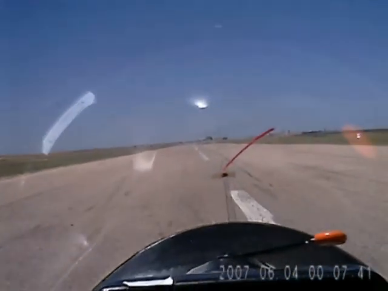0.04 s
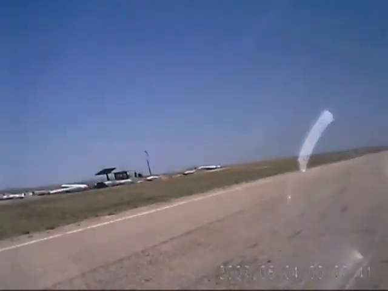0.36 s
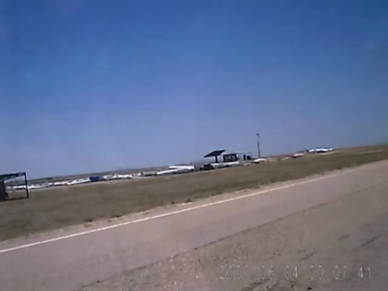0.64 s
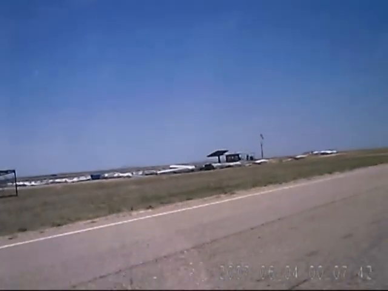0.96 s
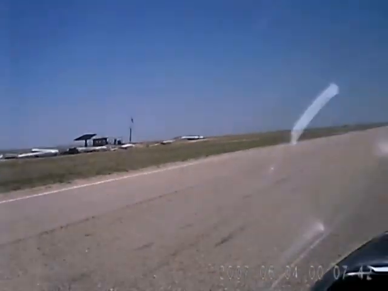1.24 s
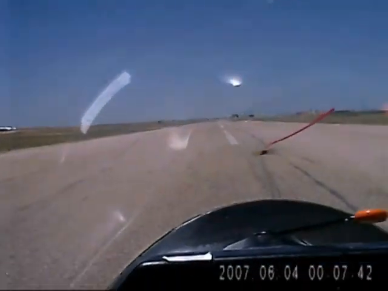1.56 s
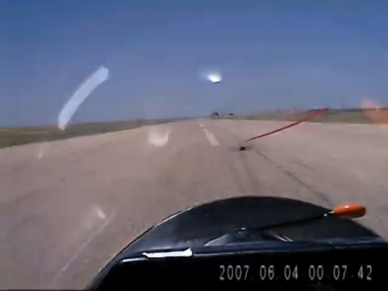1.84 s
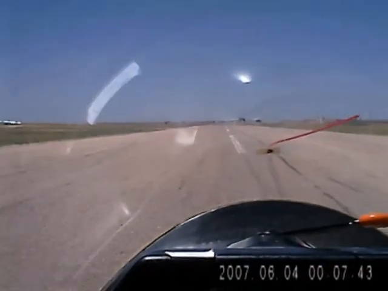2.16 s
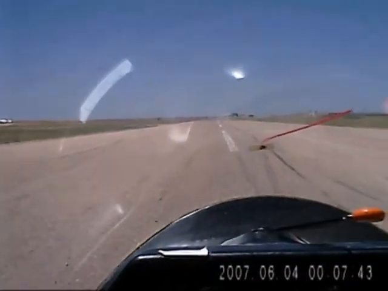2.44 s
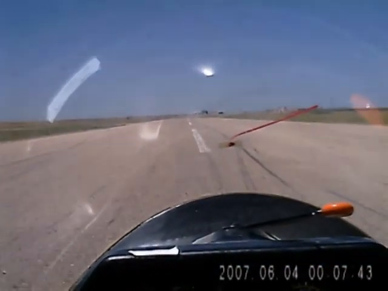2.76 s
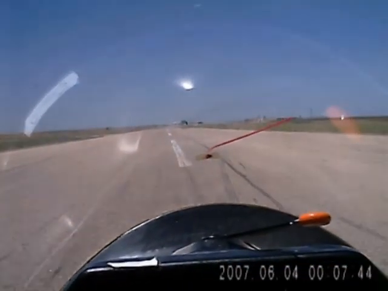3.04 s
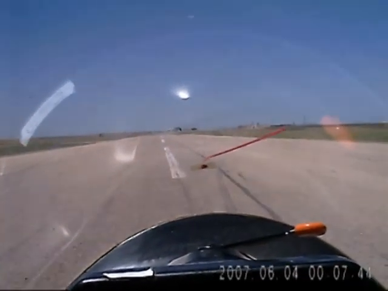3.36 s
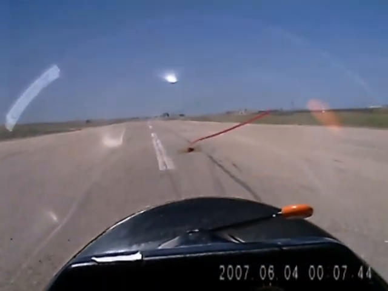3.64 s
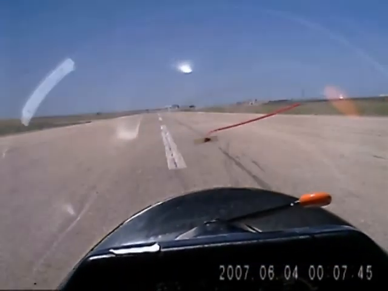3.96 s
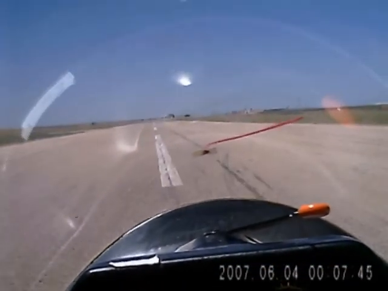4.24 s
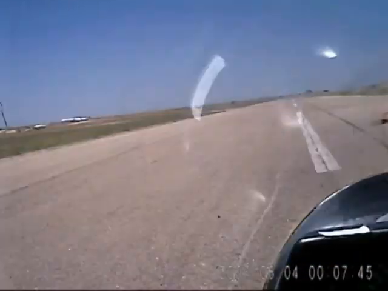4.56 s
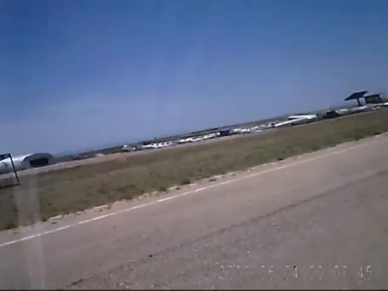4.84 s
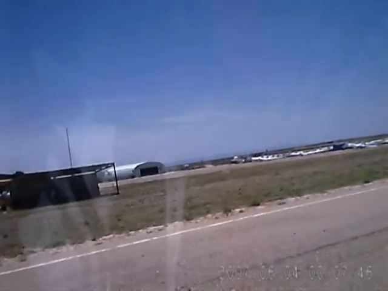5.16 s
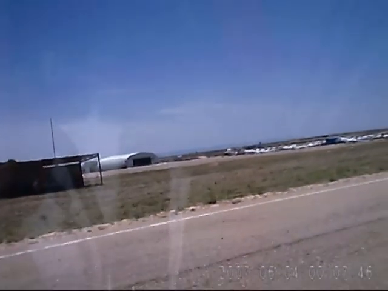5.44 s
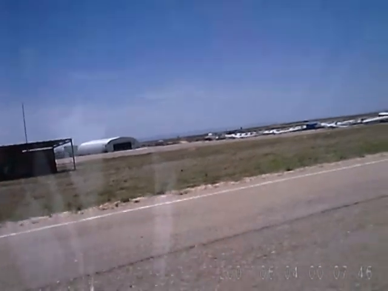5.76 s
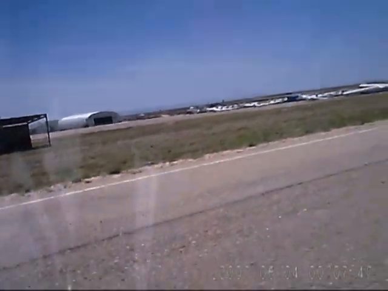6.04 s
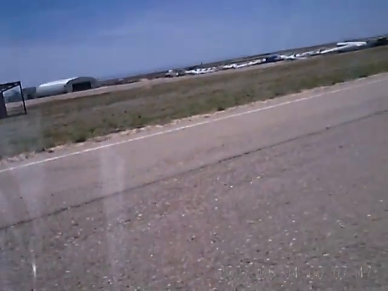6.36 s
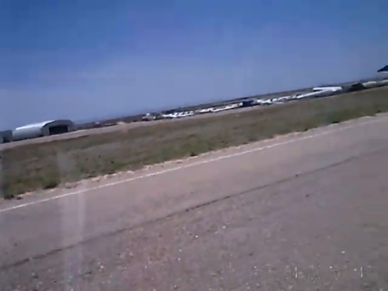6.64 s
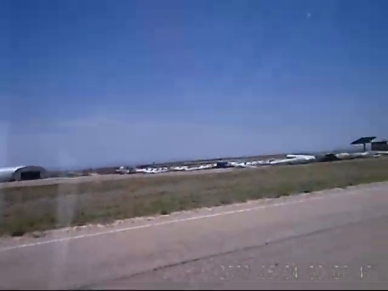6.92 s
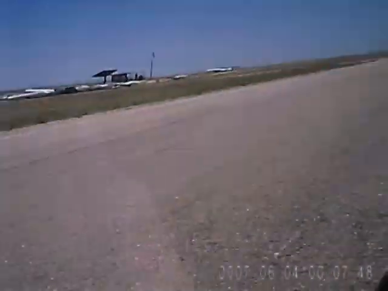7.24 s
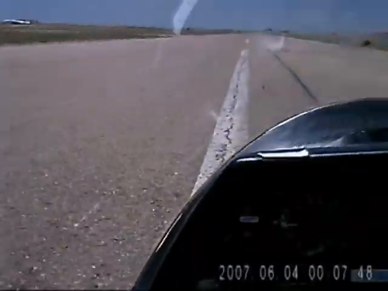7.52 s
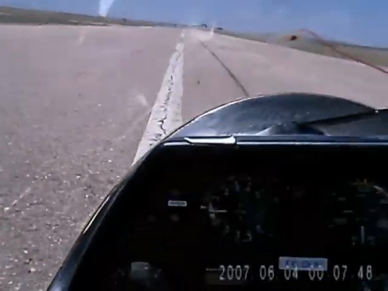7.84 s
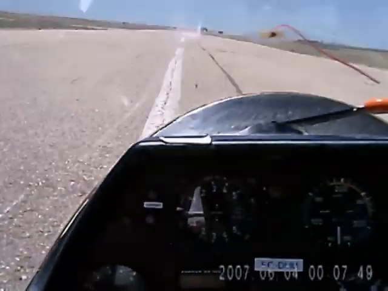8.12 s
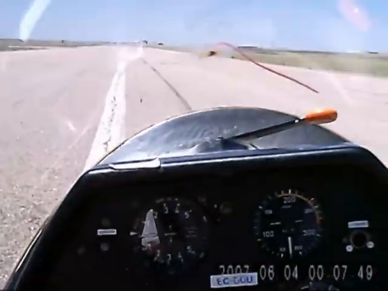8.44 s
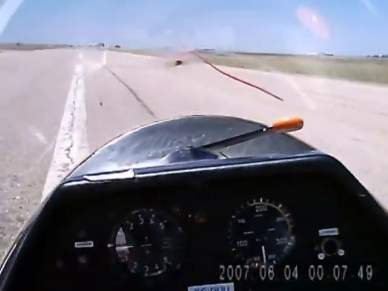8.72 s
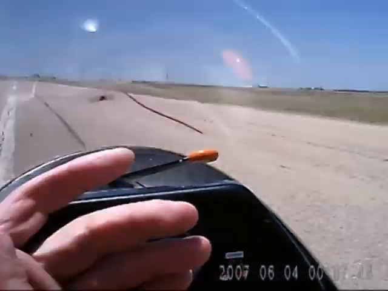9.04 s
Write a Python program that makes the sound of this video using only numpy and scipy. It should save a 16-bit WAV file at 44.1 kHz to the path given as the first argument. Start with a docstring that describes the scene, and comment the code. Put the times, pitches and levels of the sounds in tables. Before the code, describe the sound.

From inside a slowing glider, a hollow wheel rumble fades into four thuds, knocking fittings and a soft brake groan.

```python
"""Glider rolling out, from the cockpit

A small camera's microphone rides inside the cockpit as the glider slows on an asphalt runway.
The wheel rumbles through the hollow fuselage and four heavy bumps make the shell boom. Close by, air
leaks past the canopy, fittings knock, a control rod slides and the wheel brake groans and squeaks.
The camera overloads on one side of the wave and adds its own hiss and a thin whine."""
import sys
import numpy as np
from scipy import signal
from scipy.fft import rfft, irfft, next_fast_len
from scipy.io import wavfile

SR = 44100
rng = np.random.default_rng(int(sys.argv[2]) if len(sys.argv) > 2 else 0)


def master_out(mix):
    """Clip the mix to full scale and print it as 16-bit PCM to the path in sys.argv[1]."""
    frames = np.transpose(np.atleast_2d(mix))
    ceiling = np.clip(frames, -1, 1)
    pcm = np.round(ceiling * 32767).astype(np.int16)
    wavfile.write(sys.argv[1], SR, pcm)


N = 409688
SIZE = next_fast_len(N, True)
TIME, HZ = np.arange(N) / SR, np.fft.rfftfreq(SIZE, 1 / SR)

# hiss of the microphone's preamplifier: (frequency [Hz], density [dB])
PREAMP_SPECTRUM = [(20, 13), (70, 14.5), (400, 2.5), (3000, -2.5), (6000, -1.5), (11500, -3.5)]
# air leaking past the canopy seal: (time [s], level [dB]) and (frequency [Hz], density [dB])
AIR_LEVEL = [(0, -50), (3.5, -48), (5.6, -43), (8.1, -46.5), (9.29, -44.5)]
AIR_SPECTRUM = [(300, 12.5), (900, 3), (1600, 0.5), (2100, -3.5), (2600, -5.5), (2950, -2), (3400, -4.5),
                (4000, -9.5), (4600, -9), (7000, -14)]
# strokes of a control rod in its guide: (time of the top [s], level [dB], rise [s], t60 [s])
ROD_STROKES = [(6.69, -36, 0.087, .25), (6.85, -48, 0.2, 1.6), (8.8, -56, 0.27, 4)]
# resonances of the rod and of the wheel brake: (frequency [Hz], width [Hz], level [dB])
ROD_MODES = [(1070, 45, -3), (1270, 45, -1), (1424, 73, -1), (2035, 89, -5), (2130, 74, -6),
             (2630, 90, -16)]
BRAKE_MODES = [(427, 23, 2), (488, 28, -7), (579, 32, -3), (659.5, 26, -3), (768, 15, -5.5)]
# the brake bites gradually, then lets go: (time [s], rise [s], level [dB], t60 [s])
BRAKE_DRAGS = [(4.4, 1.85, -26, .9), (6.45, 0.33, -35, 1.9), (7.87, 0.17, -41.5, .4)]
# faint squeaks of the brake: (time [s], level [dB])
BRAKE_SQUEAKS = [(5.15, -56.5), (5.265, -51), (5.39, -57), (5.64, -58)]
# knocks of loose fittings: (time [s], level [dB], t60 [s]) and (frequency [Hz], density [dB])
FITTING_KNOCKS = [(5.861, -4, 0.38), (5.972, -13, .1), (6.089, -17.5, 0.21), (6.523, -27, 0.18),
                  (6.575, -27, 0.18), (6.646, -20, 0.15), (6.674, -14, 0.13), (6.788, -16.5, .1),
                  (6.962, -26, .25), (7.031, -23.5, 0.14), (7.441, -12, 0.15), (7.563, -23, 0.14),
                  (7.622, -22.5, 0.42), (7.78, -28, 0.15), (7.986, -36, 0.47), (8.857, -31.5, .1)]
KNOCK_SPECTRUM = [(60, 3.5), (150, -1), (300, 4.5), (550, 4), (850, -5), (1400, -12.5), (2100, -21),
                  (3000, -43), (8000, -44)]
# two faint clicks of microphone overload in the loud early rumble, then light rattles:
# (time [s], level [dB], t60 [s], brightness [dB/octave])
CLICKS_AND_RATTLES = [(.27, -33, .05, -1), (.35, -32, .05, -1), (3.226, -19, .1, -12),
                      (3.873, -29.5, .065, -7), (4.736, -31, .05, -7.5), (5.099, -34, .08, 0),
                      (5.302, -33, .07, -1), (5.4, -36, .06, -1), (5.787, -16, 0.022, -1),
                      (5.928, -20, 0.054, -3.5), (6.089, -22, 0.1, -10), (5.99, -30, 0.55, -10),
                      (6.21, -29, 0.21, -12.5), (6.431, -29, 0.061, -13.5), (7.345, -33, 0.089, 1.5),
                      (7.485, -31, .08, -7), (7.611, -29, 0.14, -10), (7.722, -34, .08, -10),
                      (8.739, -38.5, 0.065, 6)]
# colour of clicks, rattles and grit: (frequency [Hz], density [dB])
TICK_SPECTRUM = [(300, -14), (900, 4.5), (1600, 4), (2300, -5), (3200, -6), (4500, -14), (8000, -20.5),
                 (12000, -31)]
# resonances of the fuselage around the microphone: (frequency [Hz], width [Hz], lift [dB])
SHELL_MODES = [(125.6, 45, 6), (202, 14.4, 4.5), (221.3, 9.1, 3.5), (284.8, 27.3, 8.5), (369, 21, 8),
               (429.6, 28, 5), (467, 46, 3.5), (524.7, 18, 7), (604, 19, 4), (638, 25, 4.5), (698, 20.6, 8),
               (873, 18, 4), (1035, 14, 6.5), (1110, 27, 3.5), (1490, 160, 1.5)]
# rumble of the wheel, falling as the glider slows: (time [s], level [dB])
ROLL_LEVEL = [(0, -13.5), (1, -12.5), (3.5, -16), (5.7, -22), (6.27, -20), (6.42, -44), (6.7, -27.5),
              (7.2, -41), (8.2, -45), (8.8, -36.5), (9.05, -47)]
# thrum as the wheel takes the glider's weight: (time [s], level relative to the rolling [dB])
THRUM_LEVEL = [(0, -28), (2.3, -10.5), (4.3, -6), (5.5, -13), (6.2, -3.5), (6.8, -9), (8.6, -1.5)]
# force of the tyre on the asphalt: (frequency [Hz], density [dB])
TYRE_SPECTRUM = [(25, -25.5), (55, -9.5), (82, -23.5), (115, -7), (165, -4), (250, -1), (340, -6),
                 (480, -9), (720, -17), (950, -24.5), (1500, -33.5), (2300, -48), (4000, -58)]
# heavy bumps of the undercarriage:
# (time [s], judder [dB], rise [s], t60 [s], brightness [dB/octave], boom [dB], clank [dB])
HEAVY_BUMPS = [(5.750, -4.5, 0.022, 1.54, 1, -2.5, -18), (7.252, -4.5, 0.037, 0.58, 1, -12, -15),
               (8.275, -13, 0.038, 0.45, -1.5, -13.5, -25.5), (9.107, -17, 0.041, 0.35, -2.5, -17, -36.5)]
# colour of the undercarriage's judder: (frequency [Hz], density [dB])
JUDDER_SPECTRUM = [(25, -9), (60, -7.5), (120, 2.5), (250, -1), (480, -4), (720, -9.5), (1100, -21),
                   (1800, -25.5), (3000, -43.5), (6000, -54.5), (12000, -63)]


def amp(db):
    """Decibels to gain."""
    return 10 ** (np.asarray(db) / 20)


def unit(x):
    """Scales to an rms of 1."""
    return x / np.sqrt(np.mean(x ** 2) + 1e-20)


def level(curve):
    """Gain at every sample from rows (time [s], level [dB])."""
    return amp(np.interp(TIME, *np.transpose(curve)))


def colour(points):
    """Gain at every frequency from rows (frequency [Hz], density [dB])."""
    hz, db = np.transpose(points)
    return amp(np.interp(np.log(HZ + 1), np.log(hz), db))


def peak(hz, width):
    """Bell shape of one resonance."""
    return 1 / (1 + (2 * (HZ - hz) / width) ** 2)


def ringing(modes):
    """Gain at every frequency of a part with the given resonances."""
    return sum(amp(db) * peak(hz, width) for hz, width, db in modes)


def shaped(x, gain):
    """Filters x by a gain per frequency; rms 1."""
    return unit(irfft(rfft(x, SIZE) * gain, SIZE)[:N])


def tilted(x, gain, tilt_db):
    """Colours x, brighter or duller by tilt_db an octave; rms 1."""
    octaves = np.log2(HZ + 200) - 10
    return shaped(x, gain * amp(tilt_db * octaves))


def noise(gain):
    """Coloured noise of rms 1."""
    return shaped(rng.standard_normal(N), gain)


def wander(rate_hz):
    """Slow chance movement of rms 1."""
    return noise(1 / (1 + (HZ / rate_hz) ** 4))


def phase(hz):
    """Running phase in radians of a changing pitch."""
    return 2 * np.pi * np.cumsum(hz) / SR


def contacts(per_s, spread_db):
    """A train of tiny impacts at random times, their sizes scattered by spread_db."""
    size = amp(spread_db * np.minimum(rng.exponential(1, N), 4))
    return size * np.sign(rng.standard_normal(N)) * (rng.random(N) < per_s / SR)


def blow(s, rise, t60):
    """Envelope that builds up from time s over rise and then dies away."""
    age = np.maximum(TIME - s, 0)
    return np.minimum(age / rise, 1) * amp(-60 * np.minimum(np.maximum(age - rise, 0) / t60, 3))


def swell(s, rise, t60):
    """Envelope that swells smoothly to its top at time s and then dies away."""
    return np.exp(-(np.minimum(TIME - s, 0) / rise) ** 2) * amp(-60 * np.maximum(TIME - s, 0) / t60)


def canopy_leak(whistle_hz=3144, whistle_relative_db=-18.5, gust_db=1.1):
    """Air hisses past the canopy seal, almost steadily, with a faint wavering whistle."""
    pitch = whistle_hz * (1 + .035 * wander(rate_hz=5) + .03 * wander(rate_hz=149))
    whistle = amp(whistle_relative_db) * unit(np.sin(phase(pitch)))
    hiss = noise(colour(AIR_SPECTRUM))
    return level(AIR_LEVEL) * (hiss + whistle) * amp(gust_db * wander(rate_hz=9.5))


def control_rod():
    """Small slips ring the rod as it slides in its guide."""
    strokes = sum(amp(db) * swell(s, rise, t60) for s, db, rise, t60 in ROD_STROKES)
    return strokes * shaped(contacts(per_s=640, spread_db=3), ringing(ROD_MODES))


def brake(squeak_hz=2530):
    """Friction makes the wheel brake groan at its resonances and squeak on one wavering note."""
    drag = sum(amp(db) * blow(s, rise, t60) for s, rise, db, t60 in BRAKE_DRAGS)
    groan = drag * noise(ringing(BRAKE_MODES))
    squeaks = sum(amp(db) * swell(s, rise=.035, t60=.2) for s, db in BRAKE_SQUEAKS)
    pitch = squeak_hz * (1 + .0071 * wander(rate_hz=41))
    return groan + squeaks * unit(np.sin(phase(pitch)))


def knocks_and_ticks(shell, rocking_from_s=6.4, jostle_knock_db=-39.5, jostle_rattle_db=-47):
    """Two early overload clicks; later, fittings knock and rattle, jostled as the slow glider rocks."""
    strikes = sum(amp(db) * blow(s, rise=.0023, t60=t60) for s, db, t60 in FITTING_KNOCKS)
    jolts = contacts(per_s=20, spread_db=1.6) * (TIME > rocking_from_s)
    jolt_energy = signal.fftconvolve(jolts ** 2, blow(0, rise=.0022, t60=.1) ** 2)[:N]
    jostle = np.sqrt(abs(jolt_energy))
    knocks = np.hypot(strikes, amp(jostle_knock_db) * jostle) * noise(colour(KNOCK_SPECTRUM) * shell)
    chatter, tone = contacts(per_s=4100, spread_db=-4.5), colour(TICK_SPECTRUM)
    ticks = amp(jostle_rattle_db) * jostle * tilted(chatter, tone, tilt_db=-7.5)
    for s, db, t60, tilt_db in CLICKS_AND_RATTLES:
        ticks += amp(db) * blow(s, rise=.0008, t60=t60) * tilted(chatter, tone, tilt_db)
    return knocks + ticks


def airframe_shake(below_judder_db=10.5):
    """Envelope of the shaking that goes on in the airframe after each bump."""
    return sum(amp(db - below_judder_db) * blow(s, rise=.037, t60=1.48) for s, db, *_ in HEAVY_BUMPS)


def panel(shake, hum_hz=240.3, hum_db=-22, until_s=3.9, t60=4.2, coupling_db=-7):
    """A panel hums in sympathy until the glider has slowed, and again when a bump shakes it."""
    sympathy = amp(hum_db - 60 * np.maximum(TIME - until_s, 0) / t60)
    return (sympathy + amp(coupling_db) * shake) * noise(peak(hum_hz, width=25) ** 2)


def wheel_thrum(start_hz=154.9, sag_hz_per_s=5.5, lowest_hz=117.4):
    """The loaded wheel throbs on a low note that sinks as the glider slows."""
    pitch = np.maximum(start_hz - sag_hz_per_s * TIME, lowest_hz)
    throb = wander(rate_hz=19.2) + 1j * wander(rate_hz=21)  # wavers in both strength and phase
    return level(THRUM_LEVEL) * (throb * np.exp(1j * phase(pitch))).real


def wheel(shell, shake, rumble_relative_db=.5, grit_relative_db=-34, uneven_db=.66):
    """The tyre drums coarse asphalt through the shell, harder after each bump; stray grit ticks."""
    rumble = shaped(contacts(per_s=9000, spread_db=1), colour(TYRE_SPECTRUM) * shell)
    thrum = wheel_thrum()
    grit = shaped(contacts(per_s=200, spread_db=2), colour(TICK_SPECTRUM))
    load = np.hypot(level(ROLL_LEVEL), shake) * amp(uneven_db * wander(rate_hz=8.9))
    return load * (amp(rumble_relative_db) * rumble + thrum + amp(grit_relative_db) * grit)


def bumps(shell, boom_hz=111, clank_hz=850):
    """Each bump opens with a clank; the undercarriage then judders and the shell's lowest mode booms."""
    chatter, tone = contacts(per_s=3000, spread_db=0), colour(JUDDER_SPECTRUM) * shell
    clank = noise(peak(clank_hz, width=930) ** 2 * shell)
    boom = np.sin(phase(boom_hz * (1 + .081 * wander(rate_hz=29))))
    out = np.zeros(N)
    for s, judder_db, rise, t60, tilt_db, boom_db, clank_db in HEAVY_BUMPS:
        out += amp(judder_db) * tilted(chatter, tone, tilt_db) * blow(s, rise, t60)
        out += amp(clank_db) * clank * blow(s, rise=.014, t60=.17)
        out += amp(boom_db) * boom * blow(s, 1.3 * rise, t60=.65)
    return out


def scene():
    """Everything heard at the one microphone inside the hollow fuselage."""
    shell = amp(sum(db * peak(hz, width) for hz, width, db in SHELL_MODES))
    shake = airframe_shake()
    runway = wheel(shell, shake) + panel(shake) + bumps(shell)
    return (runway + knocks_and_ticks(shell) + control_rod() + brake() + canopy_leak())[None]


def overload(x, floor=.305, knee=.11, ceiling=1.3):
    """The camera's off-centre input stage: troughs flatten early, crests only much later."""
    floored = (x + np.hypot(x + floor, knee) - np.hypot(floor, knee)) / 2
    return floored / (1 + (floored / ceiling) ** 6) ** (1 / 6)


def record(dry, hiss_db=-51, fizz_db=-51, whine_db=-65, whine_hz=8441, edge_hz=12050, offset=-.644):
    """The camera overloads, adds hiss, converter fizz and a whine, cuts the top and sits off zero."""
    x = overload(dry[0])
    hiss = amp(hiss_db) * noise(colour(PREAMP_SPECTRUM))
    fizz = amp(fizz_db) * np.tanh(abs(x) / .045) * rng.standard_normal(N)  # grows with the signal
    whine = amp(whine_db) * unit(np.sin(phase(whine_hz + 2.5 * wander(rate_hz=3.6))))
    low_pass = signal.firwin(201, edge_hz, window=("kaiser", 8), fs=SR)
    return signal.oaconvolve(x + hiss + fizz + whine, low_pass, "same")[None] + offset


dry = scene()
out = record(dry)
master_out(out)
```